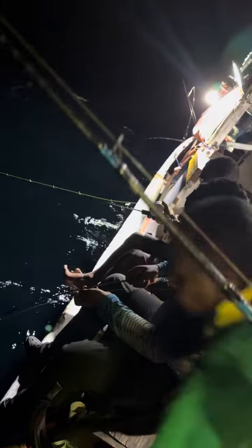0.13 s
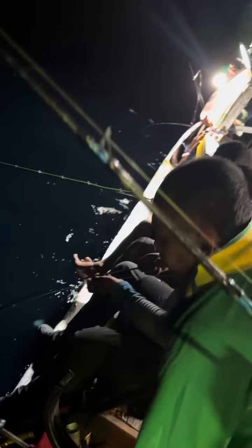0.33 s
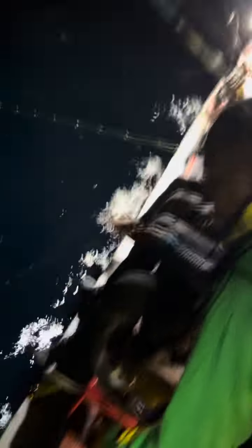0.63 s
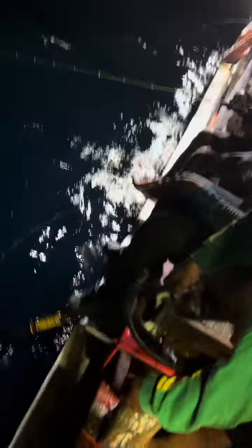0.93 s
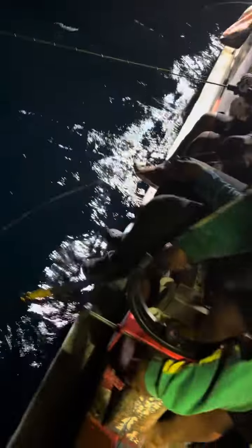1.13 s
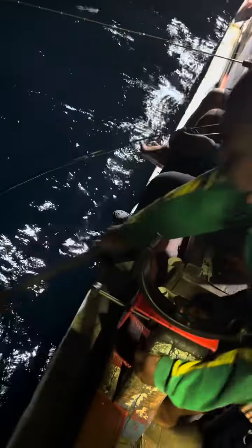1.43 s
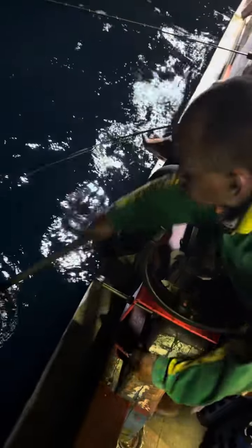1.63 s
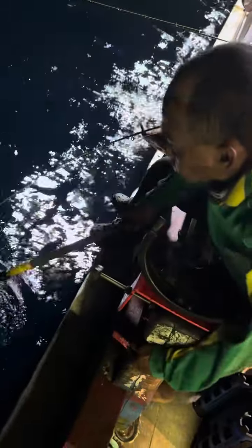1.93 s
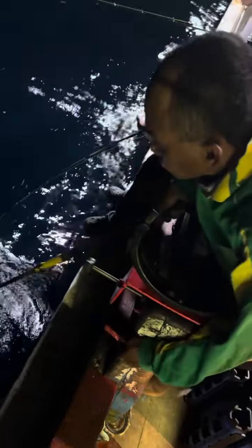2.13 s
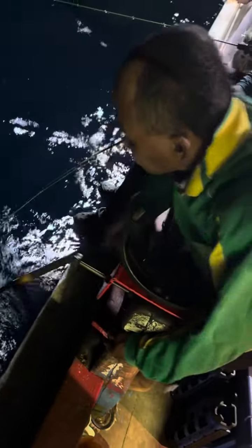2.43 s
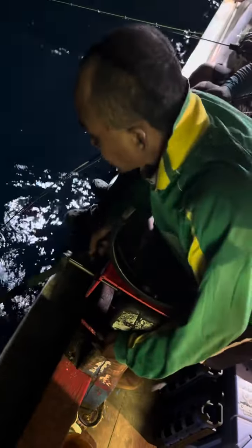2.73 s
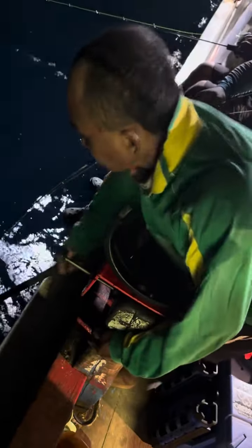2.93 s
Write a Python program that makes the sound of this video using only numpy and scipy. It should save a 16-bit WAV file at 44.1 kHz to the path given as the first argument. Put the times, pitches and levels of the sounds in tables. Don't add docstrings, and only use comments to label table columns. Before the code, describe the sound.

A boat engine hums and roars steadily while a fishing reel ticks and water hisses alongside.

```python
import sys
import numpy as np
from scipy import signal
from scipy.fft import rfft, irfft, next_fast_len
from scipy.io import wavfile
from scipy.ndimage import uniform_filter1d, map_coordinates

SR = 44100
rng = np.random.default_rng(int(sys.argv[2]) if len(sys.argv) > 2 else 0)


def nominal_scale(level):
    x = np.asarray(level, float) / 20
    return 10 ** x


def dump_mix(stems):
    frames = np.atleast_2d(stems).T
    limited = np.clip(frames, -1, 1)
    pcm = np.round(limited * 32767).astype(np.int16)
    wavfile.write(sys.argv[1], SR, pcm)


N = 136710

# time_s, cycle_hz
FAST_SPEED = [(0, 18.59), (1.4, 18.61), (1.7, 18.65), (3.1, 18.67)]
FAST_TONES = [-38, -28, -34, -20, -33, -48, -38, -38, -32, -36, -37, -48, -55, -44, -38, -46, -50, -43, -52,
              -51, -54, -56, -62, -64, -60, -57, -55, -62, -64, -55, -50, -55]
# time_s, level_db
FAST_LOAD = [(0, 2.5), (1.0, 1), (1.3, -1), (2.6, 0.1), (3.1, -.5)]
SLOW_TONES = [-44, -32, -39, -27, -34, -32, -25.5, -33, -46, -38, -46, -43, -36]
# pitch_hz, level_db (per Hz)
ROAR_COLOUR = [(350, -36.5), (500, -1), (640, 0), (950, -4), (1450, -10.5), (2600, -14.5), (4500, -19),
               (6000, -65.5)]
# pitch_hz, level_db (per Hz)
EXHAUST_COLOUR = [(90, -49), (150, -7.5), (240, -3), (300, -8.5), (340, -8.5), (420, -9.5), (520, -20.5),
                  (800, -53)]
# pitch_hz, level_db (per Hz)
COVER_COLOUR = [(900, -32), (1100, -3.5), (1300, -1), (1480, -13.5), (2200, -22.5), (2480, -8.5),
                (2700, -24), (2900, -39)]
# time_s, level_db
COVER_LEVEL = [(0, -39.5), (.5, -46), (.8, -46.5), (2.2, -45.5), (3.1, -46)]
# pitch_hz, level_db (per Hz)
RUMBLE_COLOUR = [(20, -40), (32, -10), (45, -2.5), (70, -3.5), (120, -3), (160, -14), (220, -29.5),
                 (400, -74.5)]
# time_s, level_db
RUMBLE_LEVEL = [(0, -25), (.17, -25), (.3, -26), (.36, -23.5), (.5, -20.5), (.68, -21), (.76, -22),
                (.95, -21.5), (1.12, -27.5), (1.24, -29), (1.35, -24), (1.46, -24), (1.75, -24), (1.9, -23),
                (2.05, -21), (2.25, -23.5), (2.7, -27.5), (3.1, -29.5)]
# pitch_hz, level_db (per Hz)
HISS_COLOUR = [(3000, -12.5), (4000, -10.5), (5000, 0), (6300, 0.5), (9500, -0.5), (12900, -7),
               (14200, -6.5), (16000, -11.5)]
# time_s, level_db
SPRAY_SWELL = [(0, -.5), (1.1, -.5), (1.25, 2.5), (2.2, 2.5), (2.35, -.5), (3.1, -.5)]
# pitch_hz, level_db (per Hz)
RUSTLE_COLOUR = [(700, -32), (1500, -3.5), (2700, -2.5), (4000, -12), (6000, -8.5), (9000, -13.5),
                 (12000, -11.5), (16000, -13.5)]
# time_s, level_db
RUSTLE_LEVEL = [(0, -72), (1.15, -55), (1.26, -39.5), (1.36, -55), (1.68, -58), (1.75, -48), (1.87, -37.5),
                (1.905, -46), (1.93, -39.5), (2.02, -41.5), (2.06, -61), (2.2, -49), (2.35, -56.5),
                (3.1, -72)]
# centre_s, level_db, length_s
PUFFS = [(0.06, -21, 0.1), (0.117, -30, 0.098), (0.182, -18.5, 0.11), (0.289, -18.5, 0.05),
         (0.397, -26, 0.17), (0.56, -29, 0.16), (0.669, -19.5, 0.071), (0.776, -26, 0.11),
         (0.868, -19, 0.11), (1.032, -18.5, 0.082), (1.19, -31, 0.11), (1.47, -36, 0.074),
         (2.184, -38, 0.05), (2.46, -36, 0.046)]
# pitch_hz, level_db (per Hz)
PUFF_COLOUR = [(25, -28), (60, -6), (120, 4), (300, -3.5), (600, -17), (1000, -29.5), (1500, -46),
               (2200, -81)]
# centre_s, level_db, pitch_hz, half_length_s
BUMPS = [(.178, -16, 95, .015), (.567, -14, 170, .005), (.443, -14, 70, .012), (.5722, -21, 560, .0025),
         (.5752, -14, 330, .004), (.5838, -15, 300, .004), (.5862, -19, 480, .0025),
         (.5992, -3.5, 95, .007), (.583, -15, 62, .016), (.612, -20, 260, .012), (1.235, -16, 110, .014),
         (1.445, -16, 110, .01), (2.469, -10, 88, .009)]
# start_s, peak_db
TICKS = [(0.4514, -32.5), (0.9395, -28.5), (0.9543, -35), (0.9764, -32), (1.0086, -30.5), (1.0372, -30.5),
         (1.1, -32.5), (1.1278, -32), (1.1548, -31.5), (1.2111, -28), (1.2225, -39), (1.2366, -32),
         (1.249, -37.5), (1.258, -34), (1.2724, -31.5), (1.281, -39.5), (1.292, -29), (1.33, -27.5),
         (1.39, -29.5), (1.4232, -32), (1.4474, -30), (1.5199, -33), (1.6, -25.5), (1.729, -29),
         (1.747, -34), (1.8183, -30), (1.908, -23.5), (1.9899, -41), (2.0027, -27.5), (2.0817, -35),
         (2.193, -31.5), (2.9605, -31), (3.076, -32.5)]
# pitch_hz, width_hz, level_db
PAWL = [(4980, 440, -8.5), (5610, 130, 2), (6480, 240, -3), (8600, 58, -4)]
# start_s, level_db, pitch_hz, fade_s (time to fall 60 dB)
KNOCKS = [(1.522, -32, 3200, .05), (1.745, -26, 1150, .06), (1.752, -27, 2300, .05),
          (1.749, -31, 1600, .05), (1.754, -19, 920, .07), (1.815, -29, 2700, .05),
          (1.8585, -31, 2200, .04), (1.886, -25, 1000, .08), (1.893, -28, 1500, .06),
          (1.895, -23, 2670, .05), (1.896, -25, 2170, .05), (1.905, -24, 2700, .06),
          (1.906, -27, 2200, .04), (1.908, -28, 4300, .03), (1.931, -28, 1700, .05),
          (1.969, -29, 2950, .05), (1.992, -27, 800, .06), (1.993, -32, 4000, .04), (2.009, -29, 1800, .06),
          (2.011, -29, 2550, .08), (2.024, -31, 2500, .04)]
# pitch_hz, likeness (1 = same)
ALIKE = [(250, 0.97), (550, 0.57), (1200, 0.75), (2000, 0.98), (3000, 0.73), (4800, 0.35), (5900, 0.73),
         (10000, 0.9)]
# (from 10.7 to 13.5 kHz left and right are opposite in sign,
# so the middle nearly vanishes there)
PORT_LEAD = [(400, 0), (1100, .4), (2000, 0), (2800, .9), (5300, 0), (9800, -2.35), (10700, -np.pi),
             (13500, -np.pi), (14300, -4.35)]


def unit(x):
    return x / np.sqrt(np.mean(x ** 2) + 1e-20)


def along(points, hz):
    f, v = np.transpose(points)
    return np.interp(np.log(hz + 1), np.log(f + 1), v)


def curve(rows):
    return np.interp(np.arange(N) / SR, *np.transpose(rows))


def wobble(rate_hz):
    knots = rng.standard_normal(int(N * rate_hz / SR) + 4)
    return map_coordinates(knots, [np.arange(N) * rate_hz / SR])


def filtered(x, response):
    m = next_fast_len(N + SR // 2)
    return irfft(rfft(x, m) * response(np.fft.rfftfreq(m, 1 / SR)), m)[..., :N]


def rush(colour, patchy_db):
    spectrum = signal.stft(rng.standard_normal((2, N)), nperseg=512)[2]
    patches = uniform_filter1d(rng.standard_normal(spectrum.shape[1:]), size=6, axis=0)
    patches = unit(uniform_filter1d(patches, size=10, axis=1))
    pair = signal.istft(spectrum * nominal_scale(patchy_db * patches), nperseg=512)[1][:, :N]

    def mid_side(hz):
        turn = np.arccos(np.clip(along(ALIKE, hz), -1, 1)) / 2
        return nominal_scale(along(colour, hz)) * [np.cos(turn), np.sin(turn)]

    mid, side = filtered(pair, mid_side)
    return unit(np.array([mid + side, mid - side]))


def gusts():
    t = np.arange(N) / SR
    return sum(nominal_scale(db) * np.exp(-((t - s) / (length / 2)) ** 2) for s, db, length in PUFFS)


def hum(angle, levels_db, first, bend, lag):
    total = 0
    for k, db in enumerate(levels_db, first):
        level = nominal_scale(db + 0.9 * wobble(3.12))
        total = total + level * np.sin(k * angle + bend * k * k + lag + 0.07 * wobble(6.44))
    return total


def engine_tones(fast):
    slow = 2 * np.pi * 8.54 * np.arange(N) / SR + 5.55
    fast_hum = nominal_scale(curve(FAST_LOAD)) * hum(fast, FAST_TONES, first=4, bend=0.38, lag=-2.3)
    return fast_hum + hum(slow, SLOW_TONES, first=5, bend=0.09, lag=-2.85)


def engine_roar(fast):
    roar = nominal_scale(-36) * rush(ROAR_COLOUR, patchy_db=1.0)
    roar = roar + nominal_scale(-31.5) * rush(EXHAUST_COLOUR, patchy_db=1.4)
    roar = roar + nominal_scale(curve(COVER_LEVEL)) * rush(COVER_COLOUR, patchy_db=1.5)
    firing = 1 + 0.13 * np.cos(fast) * np.cos(2 * fast)
    return roar * nominal_scale(0.19 * wobble(6.5)) * firing


def wind_duck():
    t = np.arange(N) / SR
    strength = uniform_filter1d(gusts(), size=4000) / nominal_scale(-20)
    duck = 0.42 * np.clip(strength, 0, 1) ** 2
    deep_cut = 0.64 * np.exp(-((t - 0.15) / 0.09) ** 4)
    return np.maximum(duck, deep_cut)


def engines():
    fast = 2 * np.pi * np.cumsum(curve(FAST_SPEED)) / SR + 2.33
    pan = nominal_scale([[-0.2], [0.2]])
    motor = nominal_scale(-0.7) * np.sqrt(2) * pan * engine_tones(fast) + engine_roar(fast)
    middle = filtered(motor.mean(axis=0), lambda hz: (hz > 215) & (hz < 950))
    return motor - wind_duck() * middle


def rumble():
    return nominal_scale(curve(RUMBLE_LEVEL) + 3 * wobble(14)) * rush(RUMBLE_COLOUR, patchy_db=1.5)


def grains(depth_db):
    return nominal_scale(depth_db * np.clip(wobble(200), 0, 2.5) ** 2)


def water():
    level = nominal_scale(-44 + curve(SPRAY_SWELL) + 0.23 * wobble(4.2))
    return level * unit(grains(0.5) * rush(HISS_COLOUR, patchy_db=2.45))


def rustle():
    return nominal_scale(curve(RUSTLE_LEVEL)) * unit(grains(1.5) * rush(RUSTLE_COLOUR, patchy_db=-0.5))


def wind():
    noise = rng.standard_normal((2, N))
    apart, together = unit(filtered(noise, lambda hz: nominal_scale(along(PUFF_COLOUR, hz))))
    together = nominal_scale(-33.5) * together
    level = gusts() * nominal_scale(-1.5 + 1.0 * wobble(51))
    return level * np.array([together + apart, together - apart])


def bumps():
    t = np.arange(N) / SR
    total = np.zeros(N)
    for s, db, hz, half in BUMPS:
        total += nominal_scale(db) * np.exp(-((t - s) / half) ** 2) * np.cos(2 * np.pi * hz * (t - s))
    return total


def resonance(f, centre_hz, width_hz):
    push = 1j * f * width_hz
    return push / (centre_hz ** 2 - f * f + push)


def pawl_ring(f):
    return sum((-1) ** k * nominal_scale(db) * resonance(f, c, w) for k, (c, w, db) in enumerate(PAWL))


def reel():
    bursts, t = np.zeros(N + SR), np.arange(SR // 20) / SR
    for s, db in TICKS:
        fade = nominal_scale(db - 2.5 - 60 * t / 0.02)
        rise = 1 - np.exp(-t / 0.0011)
        bursts[round(s * SR):][:len(t)] += fade * rise * rng.standard_normal(len(t))
    bursts = bursts[:N]
    gain = 1 / np.std(filtered(rng.standard_normal(N), pawl_ring))
    click = nominal_scale(8.5) * filtered(bursts, lambda f: resonance(f, 6500, 4000))
    return gain * filtered(bursts, pawl_ring) + click


def tackle():
    out, t = np.zeros(N + SR), np.arange(SR // 5) / SR
    rise = 1 - np.exp(-t / 0.0015)
    for s, db, hz, fade_s in KNOCKS:
        drift = np.cumsum(rng.standard_normal(len(t))) * np.sqrt(hz / SR)
        ring = np.sin(2 * np.pi * hz * t + drift)
        out[round(s * SR):][:len(t)] += nominal_scale(db - 60 * t / fade_s) * rise * ring
    return out[:N] * nominal_scale([[2.5], [1.5]])


def snap():
    t = np.clip(np.arange(N) / SR - 2.194, 0, 1)
    tap = nominal_scale(-22.5 - 60 * t / 0.014) * (t > 0) * rng.standard_normal(N)
    bright = filtered(tap, lambda hz: (hz > 12500) + 0.5 * (hz > 8000))
    return bright * np.array([[1], [0.1]])


def scene():
    boat = engines() + rumble() + water() + rustle()
    return boat + wind() + bumps() + reel() + tackle() + snap()


def roll_off(x):
    return signal.sosfilt(signal.butter(12, 15830, fs=SR, output="sos"), x)


def record(dry):
    def ports(hz):
        lead = np.interp(hz, *np.transpose(PORT_LEAD)) * np.array([[1], [-1]])
        low_cut = 1 / np.sqrt(1 + (33 / (hz + 1)) ** 8)
        return np.exp(0.5j * lead) * low_cut * (hz < 15830)

    return roll_off(filtered(dry, ports))


dry = scene()
out = record(dry)
dump_mix(out)
```